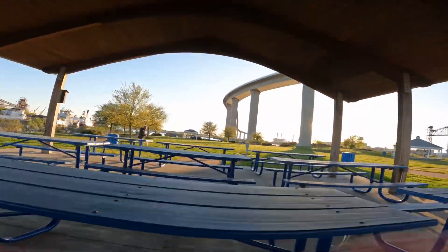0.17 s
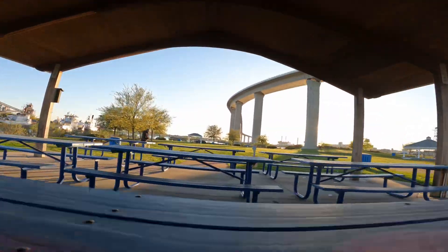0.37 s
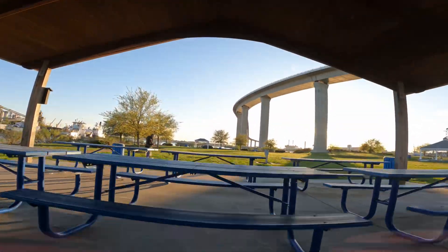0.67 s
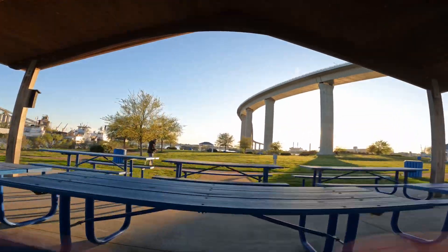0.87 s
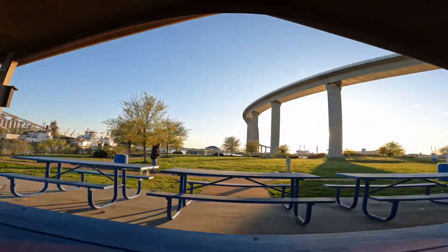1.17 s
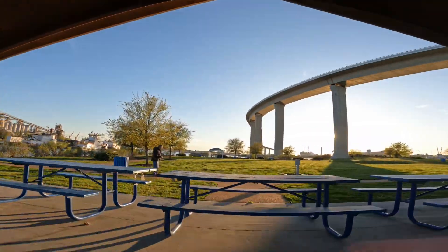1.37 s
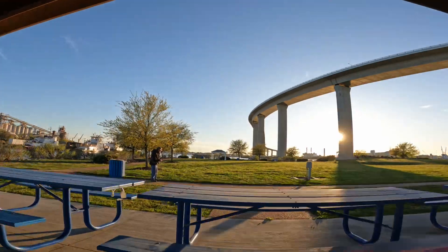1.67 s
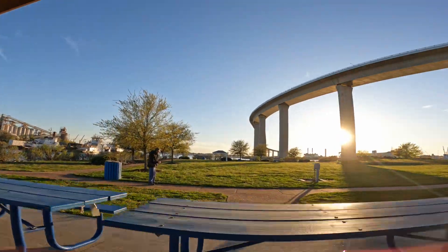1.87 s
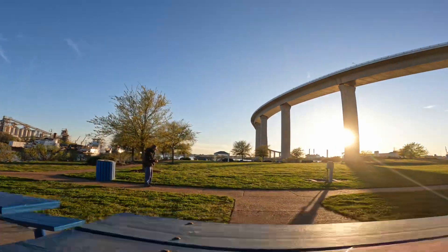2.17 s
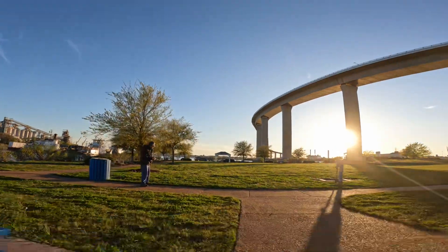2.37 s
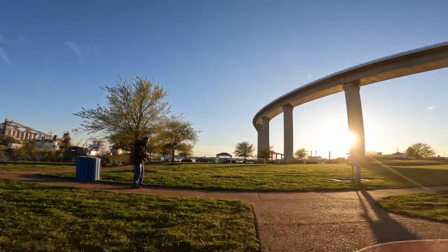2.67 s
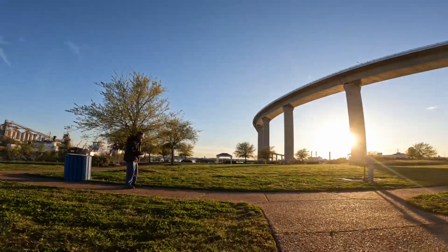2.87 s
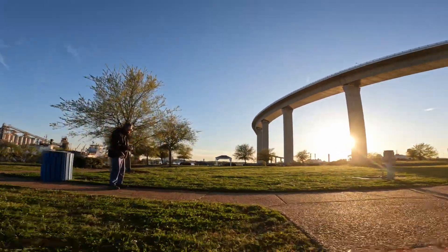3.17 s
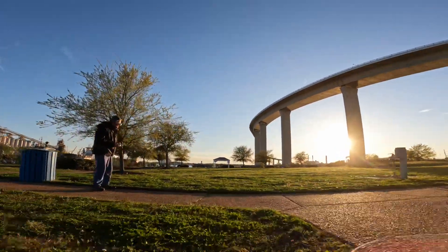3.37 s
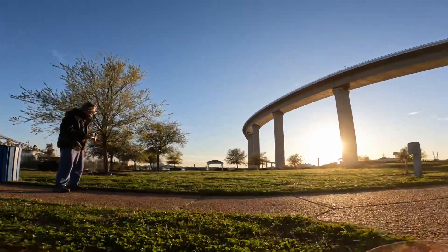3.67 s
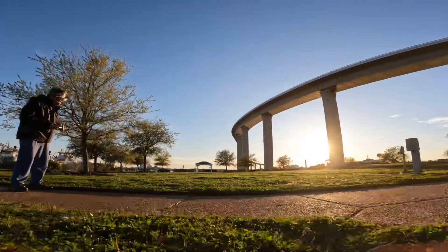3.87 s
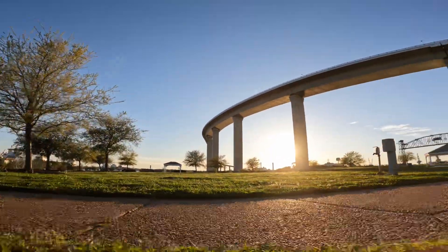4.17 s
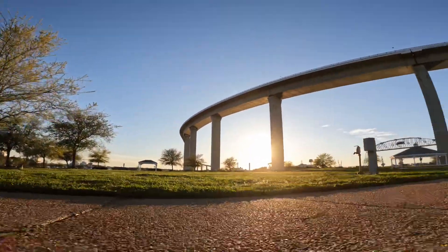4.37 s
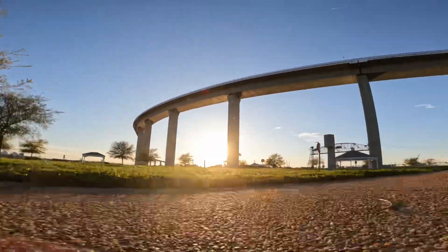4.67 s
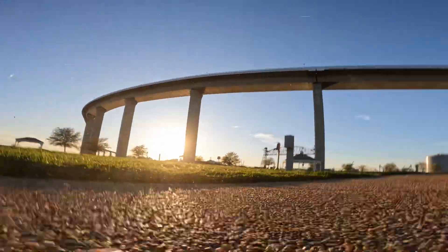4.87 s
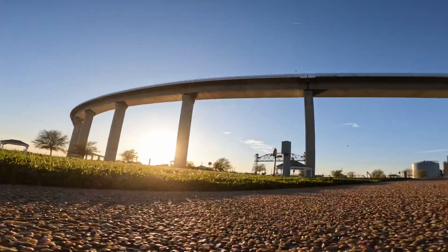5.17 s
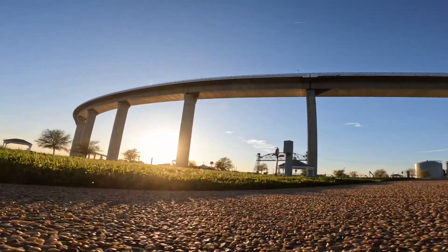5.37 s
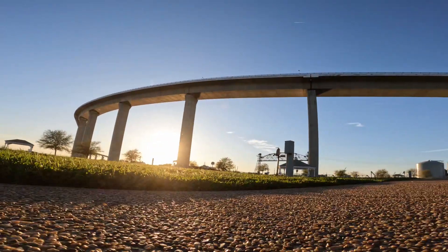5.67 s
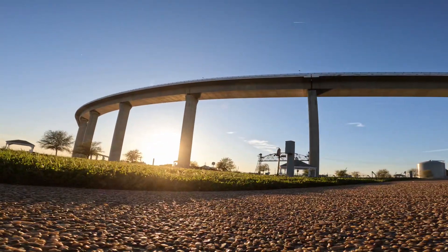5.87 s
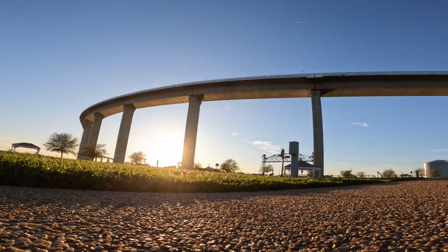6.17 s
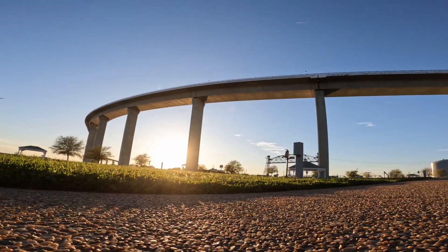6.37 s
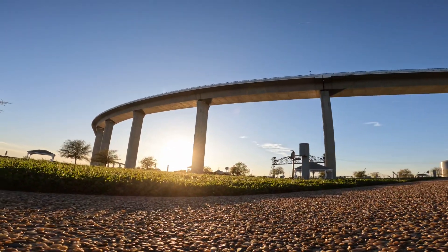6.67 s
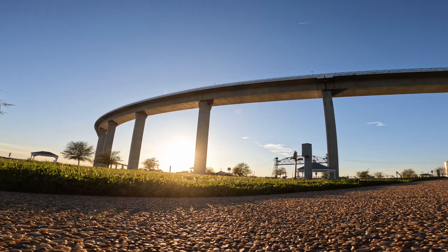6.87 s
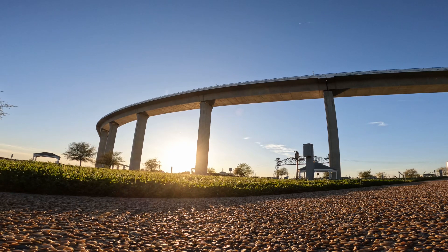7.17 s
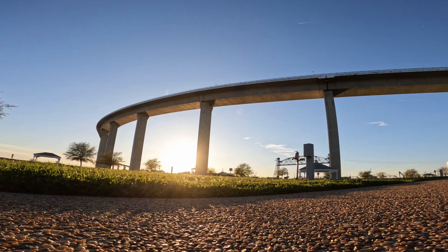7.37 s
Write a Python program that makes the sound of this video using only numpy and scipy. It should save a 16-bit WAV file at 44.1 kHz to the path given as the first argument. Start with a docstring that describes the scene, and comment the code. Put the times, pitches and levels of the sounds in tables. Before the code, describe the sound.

From the start, a small racing drone whines close up, heard from a microphone on board as it flies through a park. Two close pitches waver together over hissing air and low buffeting from the propellers. The whine rises around 0.6 seconds, dips near 1, jumps at 1.6 and turns rough around 2.5, then holds fairly steady before lifting slightly near 4. At about 4.7 seconds a last ragged rev leaps high and falls away, and the motors stop by 4.9. The drone skids on gritty paving and bounces three times, with sharp clacks and small thuds until about 5.3 seconds. It rocks to rest with faint ticks until around 6.1. The remainder is much quieter: low wind gusts on the microphone, distant traffic hum and a slight rustle of leaves until about 7.6 seconds, with two barely audible brief tones near 6.1 and 7.3.

```python
"""A whine at two close pitches comes first: the front and rear rotor pairs of a small drone carrying a camera.
Each three-blade propeller sounds at its blade-passing rate and overtones, while tip vortices hiss and
downwash buffets the microphone. After a last ragged rev the drone skids down on paving in three bounces,
each impact exciting the modes of its arms and frame. It rocks to rest with small ticks, leaving wind,
far traffic, leaves and two faint brief tones."""
import sys
import numpy as np
from scipy import signal
from scipy.fft import rfft, irfft
from scipy.io import wavfile
from scipy.ndimage import uniform_filter1d

SR = 44100
rng = np.random.default_rng(int(sys.argv[2]) if len(sys.argv) > 2 else 0)


def put_to_file(sound):
    """Save the sound as 16-bit audio at rate SR, in the file named by the first command-line argument."""
    columns = np.atleast_2d(sound).T  # one column per channel
    safe = np.clip(columns, -1, 1)
    whole_steps = np.round(safe * 32767)
    wavfile.write(sys.argv[1], SR, whole_steps.astype(np.int16))


N = 331188

# Rotor partials; the thirds come from shaft imbalance.
# Each row: multiple of the blade rate, fast pair level in dB, slow pair level in dB.
PARTIALS = [(1 / 3, -5, -5.5), (2 / 3, -21, -12), (1, 2, 1.5), (2, -14, -7), (7 / 3, -33, -23),
            (3, -20, -9), (4, -21.5, -14), (5, -20.5, -15.5), (6, -21, -15), (6.5, -25, -22.5),
            (8.5, -30.5, -22.5)]
# Each row: time in seconds, blade rates of the fast and slow pairs in Hz, blade hiss level in dB.
FLIGHT = [(0.0, 546, 487.7, -27), (0.07, 542, 481.6, -28), (0.15, 509.7, 455.4, -29),
          (0.22, 514, 462.5, -26.5), (0.38, 516, 463.6, -27), (0.43, 535, 482.3, -25.5),
          (0.5, 596.4, 543, -26.5), (0.64, 625, 580.7, -24.5), (0.75, 610.5, 558.3, -29),
          (0.8, 574, 525.3, -31.5), (0.91, 562, 506.5, -29.5), (0.99, 481.4, 438, -27.5),
          (1.06, 458.9, 419.2, -29.5), (1.17, 466, 426, -28), (1.25, 502, 456, -27.5),
          (1.32, 546, 494, -27.5), (1.42, 550.3, 498, -28), (1.51, 552, 499, -28.5), (1.56, 670, 615, -23),
          (1.59, 695, 655, -24.5), (1.62, 660, 612, -25.5), (1.65, 610, 565, -29), (1.69, 550, 505, -30),
          (1.82, 483, 444.7, -30.5), (1.91, 481, 430, -26.5), (2.02, 469, 421.2, -28.5),
          (2.16, 488, 440, -27), (2.25, 522, 467.7, -26.5), (2.38, 526, 469.6, -27), (2.48, 571, 519, -26),
          (2.565, 549.4, 505, -25.5), (2.585, 530.2, 495, -32.5), (2.72, 514, 470.7, -30),
          (2.8, 528.7, 476.4, -30.5), (2.95, 521, 466.5, -30), (3.05, 528, 477.8, -28.5),
          (3.12, 545, 485, -28), (3.16, 567, 502.7, -27), (3.27, 564, 503, -27), (3.39, 564.8, 496.3, -29),
          (3.51, 537, 482, -27), (3.62, 530, 490.7, -28.5), (3.76, 514.6, 479, -27), (3.84, 530, 485, -27),
          (3.91, 586, 521.5, -26), (4.02, 580, 530.4, -28), (4.1, 564, 525, -26.5), (4.2, 557, 520, -29),
          (4.37, 486, 449.2, -29), (4.57, 473, 437.5, -28.5), (4.64, 530.3, 495, -30.5),
          (4.66, 630, 600, -30), (4.68, 715, 680, -27), (4.697, 760, 720, -27), (4.713, 690, 649.5, -28),
          (4.74, 952, 898, -22.5), (4.765, 790, 750, -27), (4.785, 620, 560, -27), (4.815, 550, 506, -31),
          (4.835, 490, 457.6, -33), (4.86, 440, 411, -40), (4.92, 298, 282, -44)]
# Each row: time in seconds, tone levels of the fast and slow pairs in dB, overtone boost in dB.
TONE_LEVELS = [(0, -24.5, -21.5, -6), (.1, -23, -22.5, -5), (.2, -23, -25.5, 1.5), (.33, -23, -24, -2.5),
               (.45, -19, -24, -3.5), (.55, -24, -27.5, 7.5), (.65, -26.5, -27, 9.5),
               (.74, -24.5, -29.5, 5), (.9, -22, -28.5, 2), (.97, -28.5, -29.5, 3.5),
               (1.06, -22, -28.5, -2.5), (1.2, -23.5, -25, -1.5), (1.35, -23.5, -24, 1),
               (1.46, -21.5, -23.5, -1.5), (1.52, -25, -26, 2), (1.55, -29, -27, 11.5),
               (1.59, -21.5, -27.5, 3), (1.63, -27, -27.5, 7.5), (1.7, -25.5, -27, 1.5),
               (1.82, -22, -29, 3), (1.95, -27.5, -26, 4), (2.1, -23.5, -25, -2), (2.16, -23, -27, 0),
               (2.19, -31, -32, 8.5), (2.23, -25, -24.5, 3), (2.35, -29, -24.5, 6), (2.46, -24.5, -30, 7.5),
               (2.56, -28, -29, 11), (2.6, -34, -37, 4), (2.7, -24, -27.5, 0), (2.8, -23.5, -26.5, -1),
               (2.95, -24.5, -25, -1.5), (3.1, -24.5, -26, 1), (3.2, -25, -26, 3.5),
               (3.26, -26, -28.5, 5.5), (3.32, -22.5, -24, 1), (3.42, -23.5, -24, -0.5),
               (3.56, -22.5, -28, 1), (3.7, -28, -26.5, 1.5), (3.82, -21, -28, 1.5), (3.95, -25, -25.5, 3),
               (4.1, -25, -27, 4), (4.35, -28, -26.5, -1), (4.5, -24.5, -26.5, 4), (4.6, -29, -22.5, 3.5),
               (4.66, -29, -28, 5), (4.7, -30.5, -29.5, 9.5), (4.745, -24, -24.5, 15), (4.78, -24, -23, 13),
               (4.83, -24, -22, 10.5)]
# Patches of rough air. Each row: start, peak and end in seconds, peak unrest from 0 to 1.
ROUGH_AIR = [(0.451, 0.639, 0.87, 0.61), (0.7, 0.78, 0.89, 0.87), (1.56, 1.69, 1.83, 0.54),
             (2.147, 2.42, 2.5, 0.74), (2.3, 2.585, 2.77, 0.91), (3.52, 3.68, 3.77, 0.89),
             (3.84, 3.949, 4.15, 0.79), (4.0, 4.249, 4.55, 0.85), (4.351, 4.648, 5.2, 0.63),
             (4.502, 4.682, 5.2, 0.98)]

# Noise spectra. Each row: frequency in Hz, relative spectral density in dB.
BLADE_HISS_SPECTRUM = [(500, -31), (800, -14.5), (1000, -1), (1300, -4), (2000, -2), (2900, -1.5),
                       (5200, -10), (8000, -19), (9000, -31.5), (10500, -28.5), (13000, -34.5),
                       (15000, -60.5)]
BUFFET_SPECTRUM = [(20, -1.5), (50, -1.5), (120, -6), (220, -12.5), (400, -20), (700, -25), (1200, -43)]
WASH_SPECTRUM = [(150, -2.5), (300, -14), (500, 1), (800, -12), (1300, -12.5), (2500, -20.5)]
GRIT_SPECTRUM = [(1500, -11), (3000, -2.5), (5500, -6), (8000, -15.5), (9000, -23), (13000, -37.5),
                 (15000, -70.5)]
SCRAPE_SPECTRUM = [(250, -1.5), (500, -1), (1000, -3), (2000, -15), (3500, -26.5)]
WIND_SPECTRUM = [(20, -5.5), (45, -2), (80, -8), (130, -20.5), (250, -38.5)]
TRAFFIC_HUM_SPECTRUM = [(80, -16.5), (130, 0), (180, -0.5), (270, -7.5), (400, -24), (600, -36)]
TRAFFIC_ROAR_SPECTRUM = [(250, 3.5), (500, 1), (1000, -6.5), (1800, -20.5), (2500, -34), (3500, -45),
                         (7000, -48)]
LEAF_SPECTRUM = [(2500, -6.5), (6000, -3), (8000, -7), (11000, -9.5), (12300, 6), (14000, -13)]

# Swells of noise. Each row: peak time in seconds, peak level in dB, rise and fall in seconds.
TREBLE_SWELLS = [(0.1, -59, .5, .5), (2.36, -53, .5, .16)]
DOWNWASH_GUSTS = [(0.27, -18.5, 0.045, 0.098), (0.59, -16, 0.14, 0.089), (0.79, -14, 0.077, 0.035),
                  (1.66, -16, 0.22, 0.061), (2.39, -16, 0.061, 0.15), (2.5, -16, 0.051, 0.056),
                  (2.575, -12.5, 0.013, .03), (2.61, -15, .03, 0.048), (2.87, -25, .1, 0.16),
                  (3.26, -22.5, 0.058, 0.041), (3.72, -16.5, .32, .2), (3.91, -16, 0.059, 0.2),
                  (4.15, -17, 0.097, 0.093), (4.29, -17, 0.039, 0.082), (4.41, -17, 0.037, 0.09),
                  (4.655, -13, 0.024, 0.028), (4.72, -17.5, .15, 0.14)]
WIND_GUSTS = [(4.85, -23, .05, 0.061), (5.04, -25, .06, .06), (5.2, -25, .08, .12), (5.45, -38.5, .1, .08),
              (5.61, -35, .06, .05), (5.97, -34, 0.28, 0.086), (6.16, -34.5, 0.087, .06),
              (6.55, -32, .16, .2), (6.81, -28, 0.073, 0.18), (7.1, -30.5, 0.43, .12),
              (7.27, -27, 0.052, .16), (7.47, -26.5, 0.053, 0.11)]
LEAF_SWELLS = [(6.93, -69.5, .2, 0.75), (7.12, -68.5, 0.62, 0.25), (7.5, -82, .5, .1)]

# Sliding contacts with the paving. Each row: start and hold in seconds,
# relative levels of grit, scrape and frame shudder in dB, fade in dB per second.
SKIDS = [(4.719, 0.077, -38, -28, -26, 298), (4.863, 0.076, -35.5, -32.5, -42, 599.5),
         (4.937, 0.015, -22, -22.5, -25, 398), (4.975, 0.022, -23, -20.5, -13.5, 441),
         (5.065, 0.059, -31, -27.5, -20, 901), (5.139, 0.028, -31.5, -22.5, -15, 350),
         (5.244, 0.039, -34.5, -29, -21.5, 901), (5.292, 0.036, -47.5, -31, -19, 417)]
# Impacts. Each row: start in seconds, crack level in dB, crack centre in Hz, relative thud level in dB.
LANDING_KNOCKS = [(4.939, -19, 4100, -19), (4.944, -23, 4180, -34.5), (4.9516, -12, 1600, -18),
                  (4.9762, -12.5, 5050, -11.5), (4.9888, -27, 3300, -10), (4.995, -22, 1300, -12),
                  (5.0008, -32, 3160, -15), (5.0615, -18.5, 3850, -23.5), (5.066, -25, 2580, -18),
                  (5.0818, -18.5, 2830, -23), (5.085, -13, 4900, -26), (5.0973, -11.5, 2890, -18.5),
                  (5.098, -11.5, 5060, -30), (5.1079, -13.5, 5000, -21), (5.112, -14, 4300, -19),
                  (5.1456, -8, 5600, -16.5), (5.1503, -14, 5000, -13.5), (5.1668, -10.5, 5360, -15.5),
                  (5.1715, -16.5, 4300, -24.5), (5.2386, -26.5, 4230, -19.5), (5.2475, -23, 2840, -24),
                  (5.2535, -25, 2860, -19), (5.2795, -9.5, 5300, -13), (5.304, -27, 3200, -17.5),
                  (5.319, -28, 2680, -16)]
ROCKING_TICKS = [(5.431, -34.5, 2150, -28.5), (5.5227, -49, 1920, -29.5), (5.575, -38.5, 2150, -32),
                 (5.659, -51, 2170, -27), (5.7, -44.5, 1900, -28.5), (5.769, -46.5, 2140, -30.5),
                 (5.801, -41.5, 1670, -31), (5.8602, -48, 2110, -29), (5.8903, -48, 2140, -29.5),
                 (5.9386, -50, 1760, -37), (5.9984, -55, 1700, -40), (6.026, -49.5, 1660, -37),
                 (6.0747, -51, 1670, -34)]
# Structural modes. Each row: frequency in Hz, relative level in dB, time to decay 60 dB in seconds.
FRAME_MODES = [(175, -2.5, 0.068), (259.3, 1, 0.049), (384, -4.5, 0.045), (515, -8.5, 0.035),
               (691, -10, 0.03), (900, -8.5, .03), (1187, -7, 0.048), (2120, -15.5, .04)]
ARM_MODES = [(2300, -8, .03), (2900, -8, .025), (3900, -8, .03), (4900, -8, .02), (6300, -11, .03),
             (8400, -12, .03)]
# Each row: start in seconds, length before the fade in seconds, frequency in Hz, level in dB.
FAINT_TONES = [(6.07, .045, 1200, -53.5), (7.312, .012, 3500, -66)]

# A last ragged rev: the tones weaken and scatter as the pitch leaps, then falls away.
LAST_REV_S, FAST_REV_DB, SLOW_REV_DB = 4.705, -19, -9.5
STOP_S, STOP_DB_PER_S, AIR_STOPS_S = 4.82, 501, 4.93
FAR_MOTOR_DB, FAR_CALM_DB = -4, -12.5  # the far motor of a pair is weaker, and more so in calm air
TIME = np.arange(N) / SR


def rotors(spread=.035, wobble=.02, rev_scatter=.035, blur=1.9):
    """Periodic blade loading radiates tones that turbulence broadens. Returns tones and blade pulse."""
    fast_hz, slow_hz, _ = curves(FLIGHT)
    fast_db, slow_db, boost_db = curves(TONE_LEVELS)
    unrest = rough_air()
    last_rev = np.clip((TIME - LAST_REV_S) / .022, 0, 1)
    stop_db = -STOP_DB_PER_S * np.maximum(TIME - STOP_S, 0)
    fast_db = fast_db + 1.9 * walk(32) + FAST_REV_DB * last_rev + stop_db
    slow_db = slow_db + 1.9 * walk(32) + SLOW_REV_DB * last_rev + stop_db
    far_db = FAR_MOTOR_DB + FAR_CALM_DB * (1 - unrest)
    low_blur = blur * (.85 * unrest + .06 + last_rev)
    overtone_blur = blur * (unrest ** 2 + .15 + .8 * last_rev)
    tones, pulse = 0, 0
    for pair, (hz, db) in enumerate([(fast_hz, fast_db), (slow_hz, slow_db)]):
        for far in (0, 1):
            drift = unrest * (spread * walk(9) * far + wobble * walk(50))
            drift += rev_scatter * last_rev * walk(70)  # each motor's pitch scatters on its own
            blade_hz = hz * (1 + drift + .0015 * walk(60) + .003 * walk(14))
            phase = 2 * np.pi * np.cumsum(blade_hz) / SR
            # eddies cut by the blades spread each tone into a band, wider for the overtones
            slow_eddies, quick_eddies = (walk(rate) + 1j * walk(rate) for rate in (60, 200))
            for order, *pair_db in PARTIALS:
                overtone = order > 1
                depth, eddies = (overtone_blur, quick_eddies) if overtone else (low_blur, slow_eddies)
                load = (1 + depth * np.roll(eddies, rng.integers(N))) / np.sqrt(1 + 2 * depth ** 2)
                gain = undb(db + far * far_db + pair_db[pair] + boost_db * overtone * min(1, 3.7 / order))
                carrier = np.exp(1j * (order * phase + 2 * np.pi * rng.random()))
                tones += np.sqrt(2) * gain * np.imag(load * carrier)
            pulse += np.cos(phase) / 3
    return tones, pulse


def rough_air(calm=.1303):
    """Turbulence makes the controller drive the motors of a pair apart. Returns unrest from 0 to 1."""
    patches = [np.interp(TIME, times, [0, peak, 0]) for *times, peak in ROUGH_AIR]
    return np.clip(np.max(patches, axis=0), calm, 1)


def airflow(pulse):
    """Vortex shedding hisses once a blade; the unsteady pressure of downwash buffets the microphone."""
    hiss_db = curves(FLIGHT)[2]
    buffet_db = swells(DOWNWASH_GUSTS, floor_db=-25, depth_db=8.5)
    unrest, gusts = rough_air(), walk(14)
    vortices = noise() * (1 + .57 * pulse) * undb(3 * unrest * walk(180))
    hiss = colour(vortices, BLADE_HISS_SPECTRUM, 1970, 9300, flicker_db=.7)
    buffet = colour(noise(), BUFFET_SPECTRUM, 25, 135, flicker_db=1.06, rate=14)
    wash = colour(noise(), WASH_SPECTRUM, 150, 2500, flicker_db=2.5, rate=25)
    treble = colour(noise(), [(9500, -6), (12000, 0), (15000, -12)], 9500, 15000)
    treble *= undb(swells(TREBLE_SWELLS, floor_db=-90, depth_db=12))
    downwash = buffet + undb(-18.5 + 14.8 * unrest) * wash
    blowing = np.clip((AIR_STOPS_S - TIME) / .081, 0, 1)
    return blowing * (undb(hiss_db + .5 * gusts) * hiss + treble + undb(buffet_db + 1.1 * gusts) * downwash)


def skid():
    """Sliding friction over uneven grit crunches, scrapes and drives the lowest mode of the frame."""
    sizes = undb(2.8 * np.minimum(rng.exponential(size=N), 3))
    grains = noise() * (.5 + (rng.random(N) < .02) * sizes)
    grit = colour(grains, GRIT_SPECTRUM, 2500, 9000, flicker_db=1.5, rate=90)
    grit = unit(grit + .46 * unit(arms(grit)))
    scrape = colour(grains, SCRAPE_SPECTRUM, 400, 2000, flicker_db=1.5, rate=60)
    lowest_hz, _, t60 = FRAME_MODES[0]
    shudder = unit(ring(grains, lowest_hz, t60)) + .25 * colour(grains, BUFFET_SPECTRUM, 40, 350)
    return (undb(-5.5) * contact(layer=0) * grit
            + undb(.4) * contact(layer=1) * scrape
            + undb(-2) * contact(layer=2, fade_share=.61) * shudder)  # the shaking outlasts the crunch


def contact(layer, fade_share=1, grip_s=.013):
    """Gain of one skid layer: friction builds quickly, holds, and then damping gives exponential decay."""
    gain = np.zeros(N)
    for start, hold, *layer_db, db_per_s in SKIDS:
        grip = np.clip((TIME - start) / grip_s + 1, 0, 1) ** 2
        fade_db = fade_share * db_per_s * np.maximum(TIME - start - hold, 0)
        gain = np.maximum(gain, grip * undb(layer_db[layer] - fade_db))
    return gain


def impacts(table, crack_s, rise_s, wide_share, push_s, thud_db, arms_db, top_hz):
    """Impulsive excitation: each blow's sharp crack rings the arms and its soft push rings the frame."""
    cracks, pushes = np.zeros(N), np.zeros(N)
    t = np.arange(2000) / SR
    push = t / push_s * np.exp(-t / push_s)
    for start, crack_db, hz, push_db in table:
        burst = rng.standard_normal(len(t)) * (1 - np.exp(-t / rise_s)) * np.exp(-t / crack_s)
        wide = ring(burst, hz, 1.2 / hz)
        crack = unit(ring(wide, hz, 6 / hz)) + wide_share * unit(wide)
        i = int(start * SR)
        cracks[i:i + len(t)] += undb(crack_db) * crack / np.max(np.abs(crack))
        pushes[i:i + len(t)] -= undb(push_db + thud_db) * push / np.sum(push)
    cracks += undb(arms_db) * arms(cracks)
    return signal.sosfilt(signal.butter(4, top_hz, fs=SR, output="sos"), cracks) + frame(pushes)


def arms(force):
    """Resonance: the arms and propellers ring briefly in their high modes."""
    return sum(undb(db) * ring(force, hz, t60) for hz, db, t60 in ARM_MODES)


def frame(force):
    """Modal superposition: the frame and camera mount ring in modes of alternating sign."""
    return sum((-1) ** k * undb(db) * ring(force, hz, t60) for k, (hz, db, t60) in enumerate(FRAME_MODES))


def wind():
    """Turbulent pressure at the microphone port rumbles with each gust."""
    gain = undb(swells(WIND_GUSTS, floor_db=-48, depth_db=10))
    return gain * colour(noise(), WIND_SPECTRUM, 25, 110, flicker_db=1.2, rate=14)


def traffic(rise_from_s=5.7, db_per_s=2.5):
    """Broadband noise: a low hum and a far roar; the background slowly comes up after the landing."""
    hum = colour(noise(), TRAFFIC_HUM_SPECTRUM, 110, 330, flicker_db=2.5, rate=18)
    roar = colour(noise(), TRAFFIC_ROAR_SPECTRUM, 370, 2000, flicker_db=1.2, rate=14)
    roar_db = -52.5 + db_per_s * np.maximum(TIME - rise_from_s, 0)
    return undb(-38.5) * hum + undb(roar_db) * roar


def faint_tones():
    """Amplitude envelopes make two faint sinusoids start quickly and thin out."""
    tones = 0
    for start, length, hz, db in FAINT_TONES:
        t = TIME - start
        envelope = np.interp(t, [0, .008, length, length + .02], [0, 1, .7, 0])
        tones += undb(db) * envelope * np.sin(2 * np.pi * hz * t)
    return tones


def leaves():
    """Many small leaf contacts add incoherently into a high, swelling rustle."""
    gain = undb(swells(LEAF_SWELLS, floor_db=-88.5, depth_db=15))
    return gain * colour(noise(), LEAF_SPECTRUM, 4500, 14000, flicker_db=2)


def undb(db):
    """Amplitude ratio of a level in dB."""
    return 10 ** (np.asarray(db) / 20)


def unit(x):
    """Normalisation to rms 1."""
    return x / np.sqrt(np.mean(x ** 2))


def noise():
    """White Gaussian noise."""
    return rng.standard_normal(N)


def curves(table):
    """Linear interpolation of each column over time, ends held."""
    times, *columns = np.transpose(table)
    return [np.interp(TIME, times, column) for column in columns]


def swells(table, floor_db, depth_db):
    """Exponential swells as a level in dB, never under the floor: depth_db up per rise, down per fall."""
    level = np.full(N, float(floor_db))
    for peak_s, db, rise_s, fall_s in table:
        distance = np.maximum((peak_s - TIME) / rise_s, (TIME - peak_s) / fall_s)
        level = np.maximum(level, db - depth_db * distance)
    return level


def walk(rate):
    """Slow random modulation of rms 1: values held for 1 / rate seconds and smoothed twice."""
    hold = int(SR / rate)
    steps = np.repeat(rng.standard_normal(N // hold + 1), hold)
    return unit(uniform_filter1d(uniform_filter1d(steps, hold), hold)[:N])


def colour(x, spectrum, lo_hz, hi_hz, flicker_db=0, rate=20):
    """Spectral shaping to rms 1 between lo_hz and hi_hz, after which each octave flickers on its own."""
    f = np.maximum(np.arange(N // 2 + 1) * SR / N, 1)
    hz, db = np.transpose(spectrum)
    shaped = rfft(x) * undb(np.interp(np.log(f), np.log(hz), db, left=-90, right=-90))
    shaped /= np.sqrt(2 * np.sum(np.abs(shaped[(f > lo_hz) & (f < hi_hz)]) ** 2)) / N
    centres = 2. ** np.arange(np.floor(np.log2(hz[0])), np.log2(hz[-1]) + 1)
    bands = (irfft(shaped * np.clip(1 - np.abs(np.log2(f / c)), 0, 1), N) for c in centres)
    return sum(undb(flicker_db * walk(rate)) * band for band in bands)


def ring(x, hz, t60):
    """A damped oscillator: a unit impulse starts a decaying sinusoid of amplitude 1."""
    r, w = np.exp(-np.log(1000) / (t60 * SR)), 2 * np.pi * hz / SR
    return signal.lfilter([0, r * np.sin(w)], [1, -2 * r * np.cos(w), r * r], x)


def scene():
    """Superposition: the pressures of all sources add at one microphone."""
    whine, pulse = rotors()
    knocks = impacts(LANDING_KNOCKS, crack_s=.001, rise_s=.0003, wide_share=.77,
                     push_s=.0003, thud_db=0, arms_db=-27.5, top_hz=11300)
    ticks = impacts(ROCKING_TICKS, crack_s=.0032, rise_s=.003, wide_share=.9,
                    push_s=.00028, thud_db=3, arms_db=-32, top_hz=4500)
    drone = whine + airflow(pulse) + skid() + knocks + ticks
    return (drone + wind() + traffic() + faint_tones() + leaves())[None]


def record(dry, drive=1.2, housing_hz=9500, top_hz=15100):
    """Saturation in the camera rounds the peaks; its housing acts as a low-pass, and the top is cut."""
    rounded = np.tanh(drive * dry) / drive
    dull = signal.sosfilt(signal.butter(2, housing_hz, fs=SR, output="sos"), rounded)
    return signal.sosfilt(signal.ellip(8, .2, 70, top_hz, fs=SR, output="sos"), dull)


dry = scene()
out = record(dry)
put_to_file(out)
```